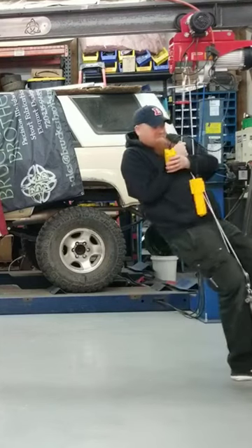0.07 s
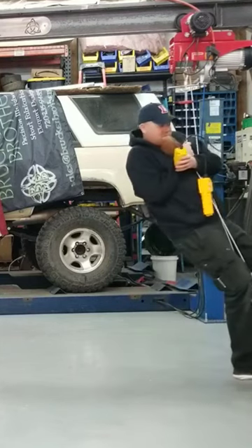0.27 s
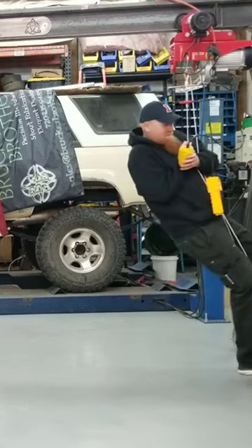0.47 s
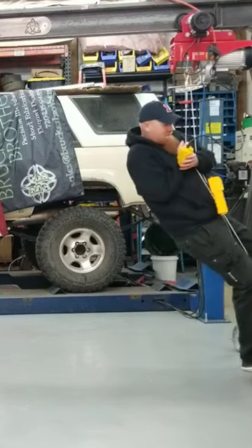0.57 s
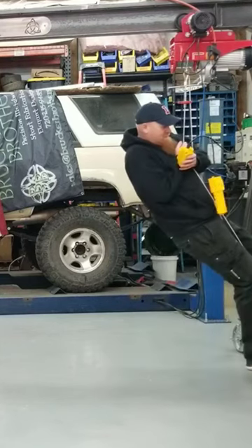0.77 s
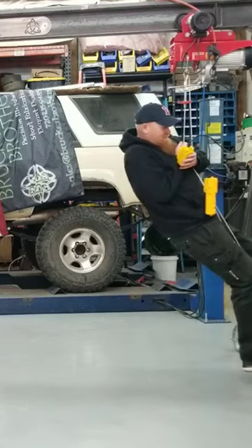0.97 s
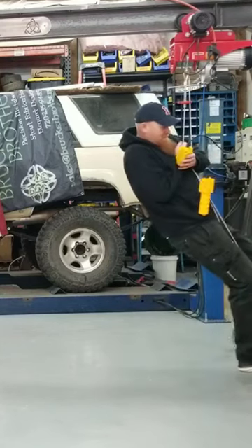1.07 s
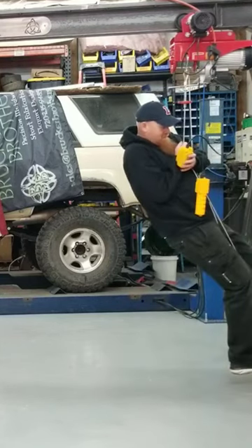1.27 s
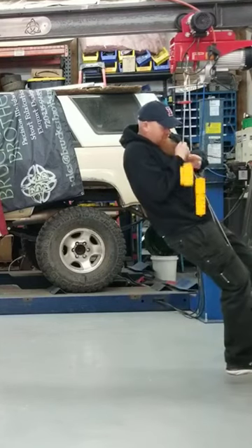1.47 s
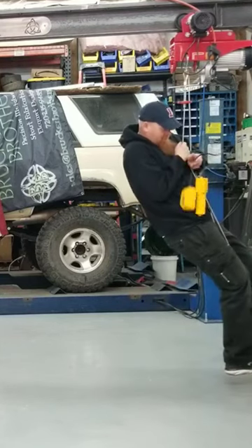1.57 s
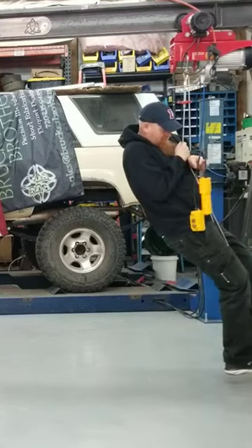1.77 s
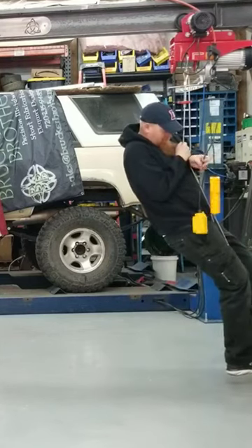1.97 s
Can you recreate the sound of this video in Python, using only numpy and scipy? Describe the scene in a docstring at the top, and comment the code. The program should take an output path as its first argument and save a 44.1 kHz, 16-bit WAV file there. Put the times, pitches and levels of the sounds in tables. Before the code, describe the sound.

An electric hoist clacks and whines through two short bursts in an echoing workshop.

```python
"""An electric hoist is jogged twice in a reverberant workshop. Each time the mechanism ticks, the brake
snaps open with a clack, and the gears whine upward as the rotor whirrs; then the brake slams shut
and its plate and the steel housing ring on. Last, the plastic control pendant is let go and knocks
hollowly as its cable catches it. The building rumbles and hisses quietly throughout."""
import sys
import numpy as np
from scipy import signal
from scipy.fft import rfft, irfft
from scipy.io import wavfile
from scipy.ndimage import uniform_filter1d

SR = 44100
rng = np.random.default_rng(int(sys.argv[2]) if len(sys.argv) > 2 else 0)


def master(y):
    """Save y as 16-bit WAV."""
    cut = np.clip(np.atleast_2d(y).T, -1, 1)
    pcm = np.round(cut * 32767)  # scale
    wavfile.write(sys.argv[1], SR, pcm.astype(np.int16))


N = 88200
T = np.arange(N) / SR
HZ = np.maximum(np.fft.rfftfreq(2 * N, 1 / SR), 1)


# Each row: start in seconds, level in dB, tilt in dB per octave, housing ring in dB,
# plate ring in dB, seating delay in seconds, seating blow in dB re the first touch.
BRAKE_RELEASES = [(0.2470, -16, 0.5, -27.5, -25.5, 0.013, -3), (0.9552, -18, -1.05, -25, -32, 0.0081, 1)]
BRAKE_SLAMS = [(0.6052, -18, 0.18, -28, -32.5, .009, -3), (1.0545, -19.5, 0, -26.5, -33, .0075, 5.5)]
# Contact spectra. Each row: frequency in Hz, relative level in dB.
RELEASE_SPECTRUM = [(100, -38), (210, -23.5), (300, -12.5), (600, -18.5), (850, -9), (1150, -11.5),
                    (1550, -2), (2100, -13), (2650, -7), (3000, 9), (3350, 1), (3750, -9), (5000, -12.5),
                    (7500, -11), (10500, -20), (12200, -5), (14200, -25.5)]
SLAM_SPECTRUM = [(100, -38), (230, -22.5), (400, -11), (600, -0.5), (800, -1.5), (1050, 2), (1650, 3),
                 (2050, -1.5), (2550, -2), (2950, 5), (3800, -3.5), (5000, -8.5), (7300, -14),
                 (8800, -25.5), (11700, -11.5), (14200, -26.5)]
# Each row: frequency in Hz, relative dB on opening, relative dB on shutting, T60 in seconds.
HOUSING_MODES = [(195, -28.5, -18.5, 0.14), (510.4, -5.5, -4, 0.12), (617.7, -1, 0, .08),
                 (644.3, -11.5, -24.5, 0.36), (776.4, -18.5, -4, 0.13), (1031, -14.5, 5.5, .09),
                 (1289, -2, 5.5, 0.089), (1370.5, -5.5, -1, .15), (1753, 5.5, 4, 0.074),
                 (2387, -5, -2, 0.17), (4080, -2.5, -3, .1)]
PLATE_MODES = [(2808, -3, 17.5, .05), (3006, 6, -6, 0.15), (3197, 1.5, -3.5, 0.013),
               (3305, 10.5, 5.5, 0.088), (3350, 5, -5, 0.074)]

def brake(strokes, spectrum, decay_s, level_column, seat_decay_s=0.0034):
    """The plate touches, chatters and seats with a second blow; plate and housing ring."""
    out = 0
    for start, db, tilt, housing_db, plate_db, seat_s, seat_db in strokes:
        force = contact(start, db, [(0, 0, decay_s), (seat_s, seat_db, seat_decay_s)])
        housing = amp(housing_db) * ring(start, HOUSING_MODES, level_column)
        plate = amp(plate_db) * ring(start, PLATE_MODES, level_column)
        out += colour(force, spectrum, tilt) + housing + plate
    return out


# Each row: multiple of the mesh frequency, relative level in dB.
MESH_HARMONICS = [(1, 2), (2, -8.5), (3, -3), (4, -10.5), (5, -11.5)]
# Each row: frequency in Hz, relative level in dB.
GEARBOX_RESPONSE = [(100, -38), (230, -31), (320, -15.5), (395, -3), (455, -2), (522, 6), (570, -5.5),
                    (620, 4), (700, -8.5), (930, -1), (1200, -7.5), (1700, -2), (2300, -16), (3100, 1.5),
                    (4500, -29), (14000, -57.5)]
ROTOR_SPECTRUM = [(200, -12.5), (800, 2), (1700, -0.5), (2400, -2), (3200, -2), (4200, -4.5), (7000, -8),
                  (7300, 3.5), (7600, -6), (11000, -20.5), (14500, -25)]

def motor(mesh_hz_per_s=1200, rise_s=.12, stop_s=0.0038, whirr_ref_hz=400):
    """From release to slam the gears whine and grind upward; rotor rub grows with speed."""
    whine_db, grind_db, whirr_db = -35.5, -44.5, -38.5
    out = 0
    for (start, *_), (stop, *_) in zip(BRAKE_RELEASES, BRAKE_SLAMS):
        age = np.clip(T - start, 0, stop - start)
        mesh_hz = mesh_hz_per_s * age
        drive = np.minimum(age / rise_s, 1) ** 2 * np.exp(-np.maximum(T - stop, 0) / stop_s)
        phase = 2 * np.pi * np.cumsum(mesh_hz * jitter(depth=.02, samples=500)) / SR
        tooth_load = jitter(depth=0.34, samples=300)
        mesh = sum(amp(db) * np.sin(order * phase) for order, db in MESH_HARMONICS)
        whine = shape(drive * tooth_load * mesh, amp(along(GEARBOX_RESPONSE)))
        grind = colour(drive * (1 + np.cos(phase)) * rng.standard_normal(N), GEARBOX_RESPONSE)
        rub = drive * (mesh_hz / whirr_ref_hz) ** 4.4
        whirr = colour(rub * rng.standard_normal(N), ROTOR_SPECTRUM)
        out += amp(whine_db) * whine + amp(grind_db) * grind + amp(whirr_db) * whirr
    return out


# Each row: start in seconds, level in dB, tilt in dB per octave, contact decay in seconds.
PENDANT_KNOCKS = [(1.785, -55.5, 4, 0.05), (1.8372, -43.5, 2, 0.0038)]
# Each row: frequency in Hz, relative level in dB.
PENDANT_SPECTRUM = [(100, -31.5), (380, -11), (540, 0), (680, 5.5), (880, -0.5), (1100, -1.5), (1270, -7.5),
                    (1480, -4.5), (2200, -10), (3300, -15.5), (4800, -18), (8300, -30), (12000, -26),
                    (14500, -37)]
# Each row: frequency in Hz, level in dB re the knock, T60 in seconds.
PENDANT_MODES = [(586, -9, 0.041), (712, -1, 0.058), (1040, -11, 0.044), (1440, -2, 0.05)]

def pendant():
    """The plastic box slips from the hand, then knocks and rings hollowly."""
    out = 0
    for start, db, tilt, decay_s in PENDANT_KNOCKS:
        force = contact(start, db, [(0.00053, 0, decay_s)])
        out += colour(force, PENDANT_SPECTRUM, tilt) + amp(db) * ring(start, PENDANT_MODES)
    return out


# Each row: start in seconds, level in dB.
MECHANISM_TICKS = [(0.242, -36.5), (0.778, -45.5), (0.949, -46)]
# Each row: frequency in Hz, relative level in dB.
TICK_SPECTRUM = [(200, -16.5), (1500, 3), (3200, 11.5), (7000, 0), (9000, -9), (12000, 0.5), (14500, -3)]

def ticks(decay_s=0.013):
    """Light contacts in the mechanism, just before each release and after the first stop."""
    return sum(colour(contact(start, db, [(0, 0, decay_s)]), TICK_SPECTRUM)
               for start, db in MECHANISM_TICKS)


# Each row: frequency in Hz, T60 in seconds.
WORKSHOP_T60 = [(150, 0.91), (500, 0.85), (1400, 0.48), (3200, 0.76), (6000, 0.25), (9000, 0.39),
                (14000, 0.23)]

def workshop(x, tail_db=2, build_s=0.0041, early_db=1, early_peak_s=0.0076, left_lag_s=0.00019):
    """Direct sound, early reflections and a dense tail whose treble dies first."""
    noise = diffuse(alike_hz=850)
    t60 = along(WORKSHOP_T60)
    octave = np.log2(np.clip(HZ, 125, 16000) / 125)
    tail = 0
    for k in range(8):
        band = np.maximum(1 - abs(octave - k), 0)
        decay = np.exp(-np.log(1000) * T / np.average(t60, weights=band))
        tail += irfft(noise * band)[:, :N] * decay
    tail *= (1 - np.exp(-T / build_s)) * amp(tail_db) / np.sqrt(SR / 25)
    early = irfft(diffuse(alike_hz=850))[:, :N] * T * np.exp(-T / early_peak_s)
    early *= amp(early_db) / np.sqrt(np.sum(early ** 2) / 2)
    direct = np.sinc(SR * (T - np.array([[left_lag_s], [0]])))
    return np.array([signal.fftconvolve(x, flatten(side))[:N] for side in direct + early + tail])


# Each row: frequency in Hz, relative spectral density in dB.
BUILDING_SPECTRUM = [(15, -43.5), (25, -6.5), (54, -0.5), (146, -11), (219, -23.5), (318, -19.5),
                     (373, -27.5), (415, -24.5), (1090, -33), (9020, -41.5), (15000, -35)]

def building(level_db=-62):
    """Steady low rumble and hiss."""
    noise = irfft(diffuse(alike_hz=497) * amp(along(BUILDING_SPECTRUM)))[:, :N]
    return noise / noise.std() * amp(level_db)


def contact(start, db, touches, rise_s=.0012):
    """White chatter of one blow, db taken over 10 ms. Each touch: delay in s, dB, decay in s."""
    power = sum((amp(touch_db) * fade(start + delay, decay)) ** 2 for delay, touch_db, decay in touches)
    grip = np.sqrt(power) * (1 - fade(start, rise_s))
    gate = np.minimum(10 * grip / grip.max(), 1)
    force = rng.standard_normal(N) * grip
    for _ in range(3):  # whiten, then confine to the blow
        force = irfft(np.exp(1j * np.angle(rfft(force))), N) * gate
    return force * amp(db) * np.sqrt(SR / 100 / np.sum(force ** 2))


def ring(start, modes, level_column=1, rise_s=0.0037):
    """Struck modes: decaying sines with random phases."""
    age = np.maximum(T - start, 0)
    out = 0
    for mode in modes:
        hz, db, t60 = mode[0], mode[level_column], mode[-1]
        out += amp(db) * np.sin(2 * np.pi * (hz * age + rng.random())) * np.exp(-np.log(1000) * age / t60)
    return out * (1 - np.exp(-age / rise_s))


def amp(db):
    """Decibels to gain."""
    return 10 ** (np.asarray(db) / 20)


def along(points):
    """Interpolates (Hz, value) rows over log frequency."""
    hz, value = np.array(points, float).T
    return np.interp(np.log(HZ), np.log(hz), value)


def shape(x, gain):
    """Minimum-phase filter with the given gain per frequency."""
    cepstrum = irfft(np.log(gain + 1e-9))
    cepstrum[1:N] *= 2
    cepstrum[N + 1:] = 0
    return irfft(rfft(x, 2 * N) * np.exp(rfft(cepstrum)))[..., :N]


def colour(x, spectrum, tilt_db=0):
    """Filters a white sound at constant power."""
    gain = amp(along(spectrum) + tilt_db * np.log2(HZ))
    return shape(x, gain / np.sqrt(np.mean(gain ** 2)))


def flatten(response):
    """Evens out broad spectral ripples, keeps the fine structure."""
    power = abs(rfft(response, 2 * N)) ** 2
    gain = np.sqrt(uniform_filter1d(power, size=3000) / uniform_filter1d(power, size=160))
    return shape(response, gain)


def fade(start, decay_s):
    """Sudden onset, exponential decay."""
    return (T >= start) * np.exp(-np.maximum(T - start, 0) / decay_s)


def jitter(depth, samples):
    """Smoothed random factor around 1."""
    noise = uniform_filter1d(rng.standard_normal(N), size=samples)
    return 1 + depth * noise / noise.std()


def diffuse(alike_hz):
    """Spectrum of stereo noise whose bass is alike left and right."""
    mid, side = rfft(rng.standard_normal((2, 2 * N)))
    alike = .9 / (1 + (HZ / alike_hz) ** 2)
    return (mid * np.sqrt(1 + alike) + side * np.sqrt(1 - alike) * np.array([[1], [-1]])) / np.sqrt(2)


# Each row: frequency in Hz, left minus right in dB.
STEREO_BALANCE = [(60, 5.5), (200, -0.5), (380, 3), (700, 3.5), (1290, 5.5), (2400, 7.5), (3600, 5),
                  (5000, 0.5), (8000, -4.5), (10000, -5), (14000, -5)]

def scene():
    """Hoist and pendant in the room; the mids lean left, the top right."""
    clacks = brake(BRAKE_RELEASES, RELEASE_SPECTRUM, decay_s=0.0091, level_column=1)
    slams = brake(BRAKE_SLAMS, SLAM_SPECTRUM, decay_s=0.0075, level_column=2)
    left, right = workshop(clacks + slams + motor() + pendant() + ticks())
    lean = amp(along(STEREO_BALANCE) / 2)
    return np.array([shape(left, lean), shape(right, 1 / lean)]) + building()


def record(dry):
    """Steep low-pass at 14.4 kHz."""
    return signal.sosfilt(signal.ellip(8, .2, 70, 14400, fs=SR, output="sos"), dry)


dry = scene()
out = record(dry)
master(out)
```